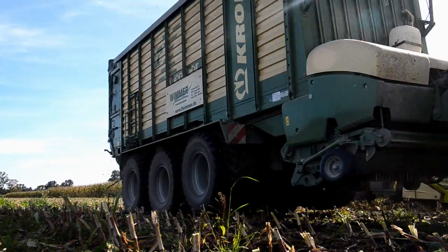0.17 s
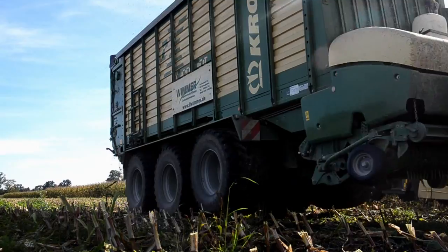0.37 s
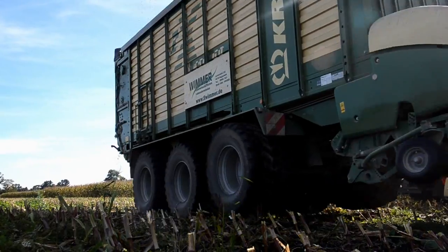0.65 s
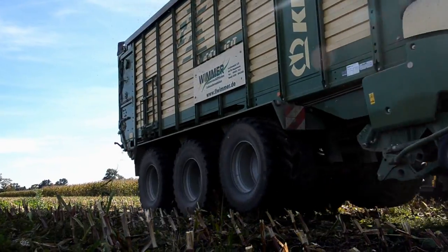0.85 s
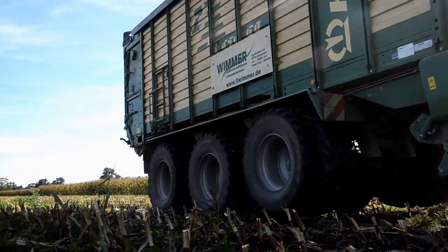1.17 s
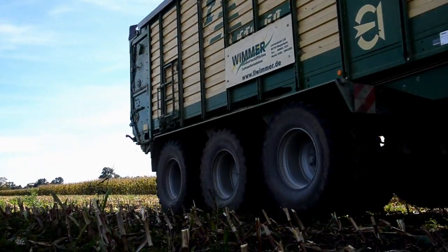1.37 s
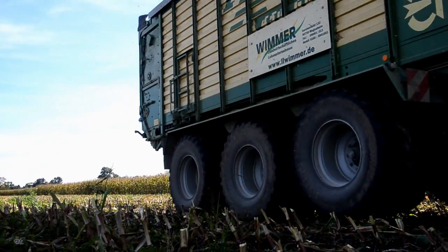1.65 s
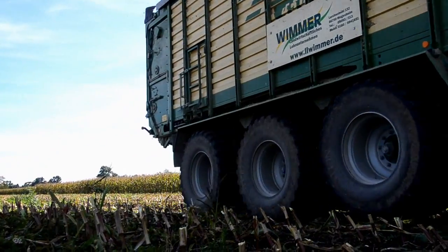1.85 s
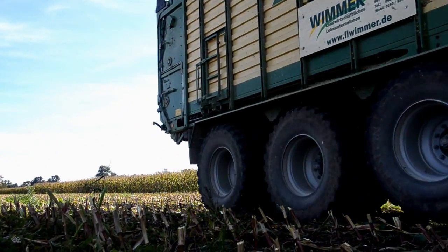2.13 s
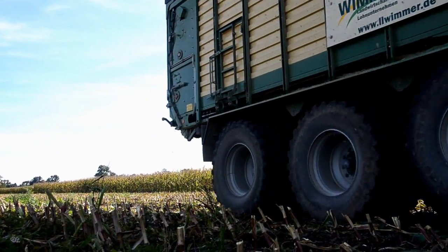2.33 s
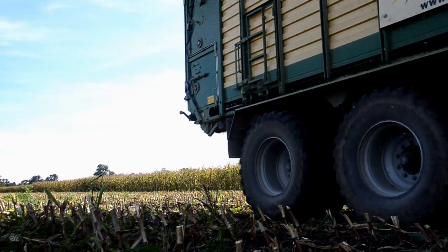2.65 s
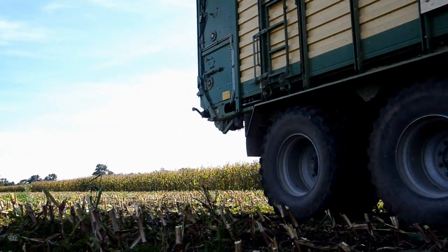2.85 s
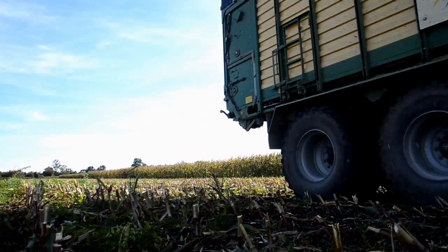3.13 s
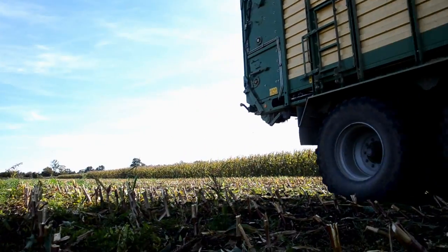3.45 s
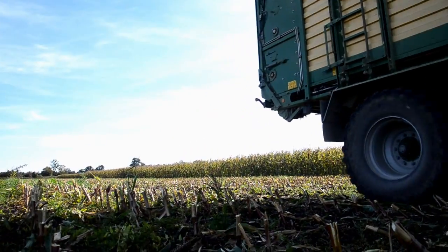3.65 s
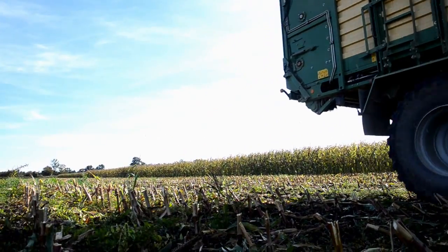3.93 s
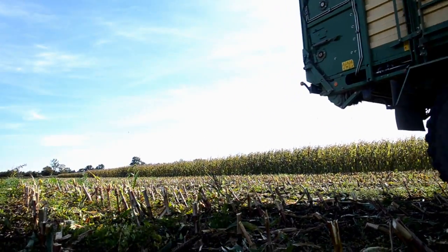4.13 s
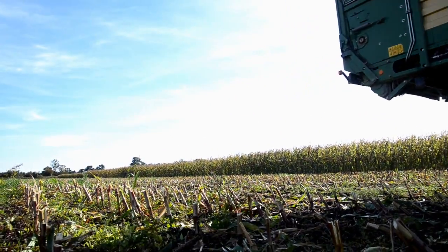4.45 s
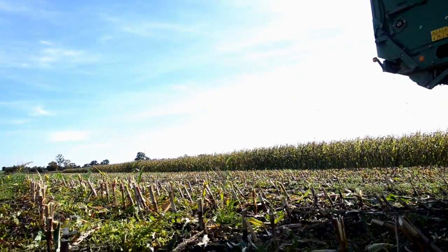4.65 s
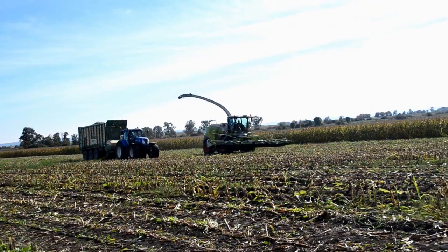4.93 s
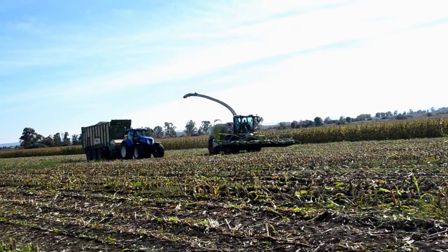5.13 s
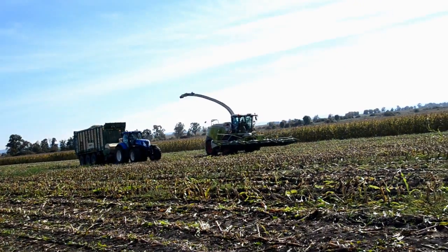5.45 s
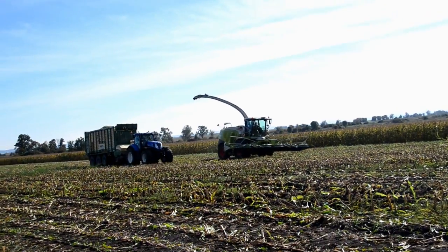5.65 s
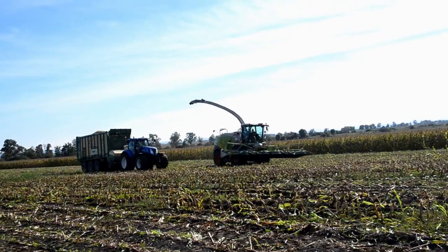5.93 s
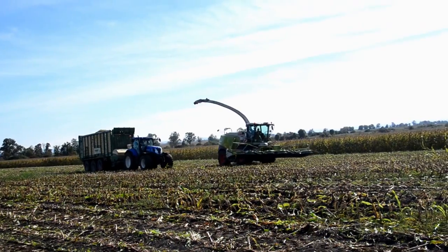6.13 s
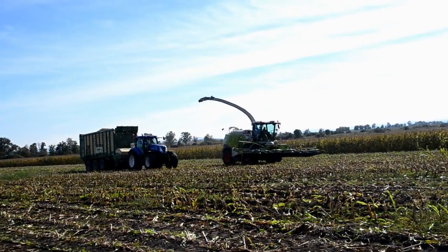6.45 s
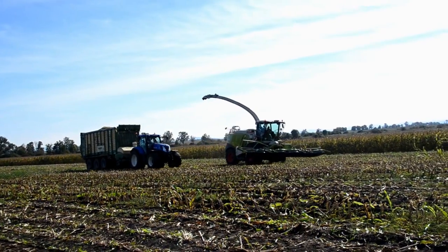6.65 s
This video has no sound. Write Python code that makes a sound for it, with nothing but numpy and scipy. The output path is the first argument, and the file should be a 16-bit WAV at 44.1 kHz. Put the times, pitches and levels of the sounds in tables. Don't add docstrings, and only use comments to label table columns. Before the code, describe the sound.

A heavy farm wagon rolls close over crackling maize stubble beside a humming harvester, then abruptly a distant machine whine with wind buffeting the microphone.

```python
import sys
import numpy as np
from scipy import signal
from scipy.fft import rfft, irfft, next_fast_len
from scipy.io import wavfile
from scipy.ndimage import uniform_filter1d

SR = 44100
rng = np.random.default_rng(int(sys.argv[2]) if len(sys.argv) > 2 else 0)


def bounce(signal):
    frames = np.transpose(np.atleast_2d(signal))
    limited = np.clip(frames, -1, 1)
    pcm = np.round(limited * 32767).astype(np.int16)
    wavfile.write(sys.argv[1], SR, pcm)


def how_loud(loudness_db):
    steps = np.asarray(loudness_db, float) / 20
    return 10 ** steps


N = 299439
TIME = np.arange(N) / SR
CUT_S = 4.8895
FADE_END_S, FADE_DB_PER_S = 5.296, 99


def in_time(rows):
    s, *columns = np.transpose(rows)
    return [np.interp(TIME, s, column) for column in columns]


def swells(rows, rest_db, edge_db_per_s):
    holds = []
    for s, length, db in rows:
        outside = np.maximum(0, np.maximum(s - TIME, TIME - s - length))
        holds.append(db - edge_db_per_s * outside)
    return np.maximum(rest_db, np.max(holds, axis=0))


def held(curves, heard):
    return [np.where(heard, c, np.mean(c[heard])) for c in curves]


def drift(rate_hz):
    pole = np.exp(-80 * np.pi * rate_hz / SR)
    noise = rng.standard_normal(N // 40 + 2002)
    slow = signal.lfilter([1], [1, -2 * pole, pole * pole], noise)[2000:]
    return np.interp(np.arange(N) / 40, np.arange(len(slow)), slow / slow.std())


def tone(hz, db, wobble):
    phase = 2 * np.pi * np.cumsum(hz * (1 + wobble * drift(9.82))) / SR
    return np.sqrt(2) * how_loud(db) * np.sin(phase + rng.uniform(0, 2 * np.pi))


def roar(colour, curves, curve_hz, offset_db, patchy_db, dips=()):
    size = next_fast_len(N)
    hz = np.maximum(np.arange(size // 2 + 1) * SR / size, 1)
    colour_hz, colour_db = np.transpose(colour)
    shape_db = np.interp(np.log(hz), np.log(colour_hz), colour_db)
    for dip_hz, width_hz, dip_db in dips:
        shape_db = shape_db + dip_db * np.exp(-((hz - dip_hz) / width_hz) ** 2)
    gain_db = shape_db + 43 + offset_db + np.mean(curves[0])
    noise = rfft(rng.standard_normal(size)) * how_loud(gain_db)
    together = drift(9)
    place = 2 * np.log2(hz / 24)
    out = 0
    for k in range(20):
        share = np.cos(np.pi / 2 * np.clip(place - k, -1, 1)) ** 2
        spot = np.interp(np.log(24 * 2 ** (k / 2)), np.log(curve_hz), np.arange(len(curves)))
        low = min(int(spot), len(curves) - 2)
        below, above = [c - np.mean(c) for c in curves[low:low + 2]]
        change_db = below + (spot - low) * (above - below)
        flicker_db = patchy_db * (0.49 * together + drift(25))
        out = out + irfft(noise * share, size)[:N] * how_loud(change_db + flicker_db)
    return out


def burst(hz, width, t60, count):
    noise = rng.standard_normal(count) * how_loud(-60 * np.arange(count) / SR / t60)
    band = [hz / width, min(hz * width, .45 * SR)]
    puff = signal.sosfilt(signal.butter(2, band, "band", fs=SR, output="sos"), noise)
    return puff / np.abs(puff).max()


def add(out, s, piece):
    at = round(s * SR)
    out[at:at + len(piece)] += piece[:N - at]


# (time [s], knife rate [Hz], level [dB])
DRUM = [(0.0, 338.2, -26.5), (0.23, 338.6, -32.5), (0.56, 340.5, -21.5), (0.61, 342.7, -29),
        (0.62, 343, -22.5), (1.39, 339.2, -20.5), (1.77, 337.2, -35), (1.98, 341.5, -31.5),
        (2.01, 339.4, -39), (2.04, 342.1, -23.5), (2.61, 343.4, -34.5), (2.83, 334.2, -36),
        (3.08, 337.7, -19.5), (3.85, 335.8, -30.5), (3.95, 336.4, -22.5), (4.1, 342.6, -35.5),
        (4.46, 337.5, -24), (4.88, 336.5, -32)]
# (multiple of knife rate, level behind the wagon [dB], roughness [dB])
DRUM_ORDERS = [(2, -42.5, 2.5), (.75, -53, 3.5), (1.26, -44.5, 5), (3, -48.5, 4), (4, -51, 4.5)]
# (time [s], length [s], level [dB])
OPENINGS = [
    [(.39, 0.53, -35.5), (1.9, .12, -38.5), (2.55, .4, -37.5), (3.5, 0.53, -37.5), (4.62, 0.27, -37.5)],
    [(0, 0.29, -30), (.66, .33, -34.5), (2.5, 0.39, -32.5), (3.38, .35, -32.5), (4.08, 0.43, -27),
     (4.65, .23, -35.5)],
    [(0, 0.12, -35.5), (.65, .3, -38.5), (1.45, .56, -36.5), (3.38, 0.097, -38.5), (3.95, 0.52, -44)],
    [(.1, .2, -42), (1.95, 0.68, -43), (3.0, 0.61, -45)],
    [(1.898, 0.081, -38.5), (2.1, .3, -40.5)],
]
OPENING_EDGE_DB_PER_S = 62
# (multiple of knife rate, level [dB])
SHAFT_ORDERS = [(.375, -39), (.5, -45.5), (.625, -42), (.875, -44)]


def harvester_drum():
    hz, level_db = in_time(DRUM)
    hz = uniform_filter1d(hz, size=5000)
    out = tone(hz, level_db + 1.5 * drift(20), wobble=.003)
    for (multiple, rest_db, rough_db), rows in zip(DRUM_ORDERS, OPENINGS):
        order_db = swells(rows, rest_db, OPENING_EDGE_DB_PER_S) + rough_db * drift(19.4)
        out += tone(hz * multiple, order_db, wobble=0.002027 * rough_db)
    for multiple, db in SHAFT_ORDERS:
        out += tone(hz * multiple, db + 5 * np.tanh(drift(3)), wobble=.03)
    return out


FIRING_HZ, FIRING_DB, FIRING_FADE_DB_PER_S = 102.4, -31, 3
# (time [s], level [dB])
SCREEN = [(0, 2), (.8, 1.5), (1.4, -0.5), (2.15, 2.5), (2.7, 3.5), (3.1, 0.3), (3.7, -2.5), (4.7, -1.5),
          (4.88, 2)]
MIDDLE_FOLLOWS, HISS_FOLLOWS = 0.38, .4
MIDDLE_LOSS_DB_PER_S, HISS_LOSS_DB_PER_S = 0.7, 1.06
# (time [s], length [s], level [dB])
RUMBLE_SWELLS = [
    (.26, 0.34, -24),
    (1.47, 1.4, -25),
    (3.36, .08, -25.5),
    (3.8, 0.032, -24.5),
    (4.4, 0.045, -25),
    (4.8, 0.073, -26.5),
]
RUMBLE_DB, RUMBLE_EDGE_DB_PER_S = -28, 43.5
NEAR_HZ = [160, 1000, 2200, 4500]
# (frequency [Hz], density [dB per Hz])
NEAR_COLOUR = [(15, -46.5), (25, -14), (101, -8), (165, -2.5), (246, -6), (290, -6.5), (340, -5.5),
               (470, -11.5), (615, -13.5), (685, -14.5), (763, -14), (1710, -16), (2700, -30.5),
               (13200, -59), (15600, -70)]
# (frequency [Hz], width [Hz], change [dB])
NEAR_DIPS = [(2380, 370, 3), (6550, 650, -4), (11800, 980, -2)]


def near_engines():
    chop = 1 + 0.072 * np.sin(2 * np.pi * .75 * FIRING_HZ * TIME)
    screen_db, = in_time(SCREEN)
    rumble_db = swells(RUMBLE_SWELLS, RUMBLE_DB, RUMBLE_EDGE_DB_PER_S)
    middle_db = MIDDLE_FOLLOWS * screen_db - MIDDLE_LOSS_DB_PER_S * TIME
    hiss_db = HISS_FOLLOWS * screen_db - HISS_LOSS_DB_PER_S * TIME
    curves = held([rumble_db, middle_db, screen_db, hiss_db], TIME < CUT_S)
    body = roar(NEAR_COLOUR, curves, NEAR_HZ, offset_db=-21.5, patchy_db=1.09, dips=NEAR_DIPS)
    firing_db = FIRING_DB - FIRING_FADE_DB_PER_S * TIME + 2.9 * drift(2.1)
    return tone(FIRING_HZ, firing_db, wobble=0.04) + chop * body


# (time [s], level [dB])
LEAVES = [(0, -69.5), (.18, -60), (.4, -61), (1.4, -57), (2.0, -56.5), (2.9, -57), (3.35, -62),
          (3.5, -72.5), (4.88, -68.5)]
LEAVES_HZ = [9000, 13500]
# (frequency [Hz], density [dB per Hz])
LEAF_COLOUR = [(3820, -25), (6500, -2.5), (8180, -2), (9850, -4.5), (13700, -11.5), (15600, -20.5)]
LEAF_TOP_FOLLOWS = 1.4


def brushed_leaves():
    leaves_db, = in_time(LEAVES)
    curves = [leaves_db, LEAF_TOP_FOLLOWS * leaves_db]
    hiss = roar(LEAF_COLOUR, curves, LEAVES_HZ, offset_db=-36.5, patchy_db=2.3, dips=NEAR_DIPS)
    return hiss * how_loud(1.2 * drift(150))


# (time [s], peak [dB])
STALKS = [(0.1171, -28), (0.2254, -41.5), (0.2478, -30.5), (0.303, -29), (0.4145, -31.5), (0.4678, -35),
          (0.5462, -33.5), (0.6474, -32.5), (0.7916, -33.5), (0.8919, -34.5), (1.0136, -35),
          (1.0899, -32.5), (1.224, -40), (1.477, -35.5), (1.5, -39), (1.6138, -38), (1.7759, -36),
          (1.9235, -41), (2.1021, -42), (2.2167, -38.5), (2.5107, -33.5), (2.6394, -33.5), (2.8643, -35.5),
          (2.9622, -36), (3.2191, -44), (3.3628, -36.5), (3.9694, -39), (4.0443, -35), (4.2419, -42),
          (4.7541, -47.5)]
SMALL_STALK_DB = -47
# (frequency [Hz], density [dB per Hz])
CRUSH_COLOUR = [(1500, -29.5), (3000, 6), (5000, -1.5), (8500, -8.5), (13500, -19.5), (15700, -17.5)]


def crushed_stalks():
    small = [(s, SMALL_STALK_DB) for s in rng.uniform(0, CUT_S, size=12)]
    away = (np.arange(2600) / SR - .03) / 0.013
    swell = np.exp(-np.where(away < 0, 1, 6.0) * away ** 2)
    pressure = np.zeros(N)
    for s, db in [*STALKS, *small]:
        add(pressure, max(s - .02, 0), how_loud(db - 12) * swell)
    crush = roar(CRUSH_COLOUR, np.zeros((2, N)), LEAVES_HZ, offset_db=0, patchy_db=1.5, dips=NEAR_DIPS)
    return pressure * crush / crush.std()


# (time [s], peak [dB])
LEAF_CRACKS = [(0.1191, -42), (0.1565, -44), (0.178, -40), (0.2463, -40), (0.3092, -38), (0.5594, -46),
               (0.7053, -48), (1.3923, -45), (1.6142, -43), (1.7894, -44)]


def leaf_cracks():
    out = np.zeros(N)
    for s, db in LEAF_CRACKS:
        add(out, s, how_loud(db - 2.0) * burst(9000, 1.7, t60=.02, count=900))
    return out


# (time [s], peak [dB], low ring [Hz], high ring [Hz])
SNAPS = [
    (3.0577, -23, 3450, 6200),
    (3.0672, -22, 2600, 4900),
    (4.0435, -31, 2850, 6000),
]


def stalk_snaps():
    out, since = np.zeros(N), np.arange(2600) / SR
    attack_s = .0008
    fading = np.minimum(since / attack_s, 1) * how_loud(-60 * np.maximum(since - attack_s, 0) / .009)
    for s, db, low_hz, high_hz in SNAPS:
        rings = np.sin(2 * np.pi * low_hz * since) + .4 * np.sin(2 * np.pi * high_hz * since)
        click = burst(3200, 1.8, t60=.009, count=len(since))
        add(out, s, how_loud(db) * (.75 * fading * rings + .45 * click))
    return out


FAR_DB, FAR_NEARING_DB_PER_S, TOP_NEARING_DB_PER_S = -44, 2.5, 3.5
DUCK_S, DUCK_WIDTH_S, DUCK_DB, DUCK_TOP_DB = 5.75, 0.14, -3, -4.5
FAR_HZ = [2000, 6000]
# (frequency [Hz], density [dB per Hz])
FAR_COLOUR = [(35, -32), (60, -9), (171, -5), (643, -21), (739, -18), (811, -17), (1200, -11.5),
              (1490, -12.5), (1710, -20.5), (2060, -18.5), (2360, -26), (2720, -28), (3760, -42),
              (4130, -42), (15600, -79.5)]
# (frequency [Hz], width [Hz], change [dB])
GROUND_DIPS = [(1735, 67, -9), (2320, 95, -1.5), (1230, 200, -6), (3670, 150, -1), (5050, 130, -2),
               (5900, 250, -3)]
WHINE_HZ = 741.4
# (multiple, level [dB], change [dB per s])
WHINE_ORDERS = [(1, -38.5, -3.5), (1.5, -47.5, -4.5), (2, -42.5, -1.5)]
# (frequency [Hz], level against the roar [dB])
FAR_LINES = [(1347, -10.5), (1898, -16.5), (2597, -28), (3340, -33), (4041, -29.5), (4819, -40)]
# (time [s], frequency [Hz], level [dB])
TURBO = [
    (5.4, 11700, -115),
    (5.52, 11850, -90),
    (5.6, 11950, -118),
    (6.15, 12700, -115),
    (6.35, 12880, -95),
    (6.79, 13080, -89),
]


def far_machines():
    since = TIME - FADE_END_S
    duck = np.exp(-((TIME - DUCK_S) / DUCK_WIDTH_S) ** 2)
    body_db = FAR_DB + FAR_NEARING_DB_PER_S * since + DUCK_DB * duck
    top_db = TOP_NEARING_DB_PER_S * since + DUCK_TOP_DB * duck
    curves = held([body_db, top_db], TIME > CUT_S)
    out = roar(FAR_COLOUR, curves, FAR_HZ, offset_db=-7, patchy_db=0.92, dips=GROUND_DIPS)
    bend = np.abs(since - .2) - 4 * np.minimum(since, 0)
    for multiple, db, change_db in WHINE_ORDERS:
        whine_db = db + change_db * bend + DUCK_DB * duck + 1.5 * drift(8)
        out += tone(WHINE_HZ * multiple, whine_db, wobble=.0006)
    for line_hz, db in FAR_LINES:
        out += tone(line_hz, body_db + db + 2 * drift(4.2), wobble=0.00081)
    return out + tone(*in_time(TURBO), wobble=.002)


# (time [s], length [s], level [dB])
GUSTS = [(4.94, .015, -15), (4.98, .015, -19), (5.21, 0.022, -22), (5.28, .13, -22.5), (5.48, .02, -27.5),
         (5.57, .1, -24), (5.7, 0.069, -21), (5.8, 0.039, -22), (5.93, 0.24, -27), (6.18, 0.13, -29.5),
         (6.36, .03, -27.5), (6.43, 0.068, -23), (6.59, .015, -25.5), (6.65, 0.094, -24.5)]
CALM_DB, GUST_EDGE_DB_PER_S = -37, 199
CALM_HIGH_DB, GUST_HIGH_EDGE_DB_PER_S = -43, 497
WIND_HZ = [150, 500]
# (frequency [Hz], density [dB per Hz])
WIND_COLOUR = [(15, -59), (30, -35), (64, -6.5), (135, 1.5), (250, -5), (450, -16), (800, -20.5),
               (1400, -41), (2500, -100)]


def wind_rumble():
    low_db = swells(GUSTS, CALM_DB, GUST_EDGE_DB_PER_S)
    high_db = swells(GUSTS, CALM_HIGH_DB, GUST_HIGH_EDGE_DB_PER_S)
    lumps = how_loud(8.0 * np.tanh(drift(50) / 1.5))
    curves = held([low_db, high_db], TIME > CUT_S)
    return roar(WIND_COLOUR, curves, WIND_HZ, offset_db=-25.0, patchy_db=0.4) * lumps


# (peak time [s], peak [dB], swing [Hz])
BUFFETS = [(5.22, -6.5, 420), (5.289, -14, 322), (5.329, -15.5, 342), (5.362, -15, 323), (5.385, -14, 314),
           (5.397, -11.5, 420), (5.415, -14, 316), (5.493, -19, 386), (5.57, -17, 335), (5.614, -18, 358),
           (5.636, -4, 422), (5.646, -17, 220), (5.68, -14, 327), (5.703, -12.5, 448), (5.722, -12, 285),
           (5.729, -13, 327), (5.742, -9, 315), (5.77, -11, 399), (5.804, -21, 308), (5.83, -9.5, 324),
           (5.883, -17.5, 494), (5.966, -18.5, 323), (6.101, -12, 274), (6.135, -10.5, 350),
           (6.198, -15, 223), (6.439, -16, 255), (6.461, -13, 263), (6.503, -16, 270), (6.711, -17, 429),
           (6.725, -14.5, 259),
           (4.94, -12, 450), (4.954, -6, 500), (4.985, -7, 300), (4.997, -12, 500), (6.313, -16, 350),
                 (6.384, -14, 300), (6.468, -12, 560), (6.603, -16, 200), (6.678, -17.5, 200),
                 (6.738, -18, 320)]
SMALL_BUFFET_DB = 6


def wind_buffets():
    out = np.zeros(N)
    gust_db = swells(GUSTS, CALM_HIGH_DB, GUST_HIGH_EDGE_DB_PER_S)
    small = rng.uniform([FADE_END_S, -4, 230], [N / SR, 2, 440], size=(35, 3))
    small[:, 1] += gust_db[(small[:, 0] * SR).astype(int)] + SMALL_BUFFET_DB
    for s, db, hz in [*BUFFETS, *small]:
        turns = (np.arange(800) / SR - .009) * np.clip(hz, 200, 600)
        shape = np.exp(-np.abs(2.4 * turns) ** 1.4) * np.cos(2 * np.pi * (turns + rng.random()))
        add(out, s - .009, how_loud(db + 1.5) * shape)
    return out


# (time [s], peak [dB])
TICKS = [
    (5.6348, -34.5),
    (5.678, -43.5),
    (5.702, -42),
    (5.7314, -44.5),
    (5.7684, -48.5),
    (5.8294, -52.5),
    (6.1364, -50),
]


def overload_ticks():
    out = np.zeros(N)
    for s, db in TICKS:
        add(out, s, how_loud(db - 4.0) * burst(3500, 3.0, t60=0.004, count=600))
    return out


def scene():
    stubble = brushed_leaves() + crushed_stalks() + leaf_cracks() + stalk_snaps()
    near = harvester_drum() + near_engines() + stubble
    wind = wind_rumble() + wind_buffets() + overload_ticks()
    far = (far_machines() + wind) * how_loud(FADE_DB_PER_S * np.minimum(TIME - FADE_END_S, 0))
    near_share = np.clip((CUT_S - TIME) / .00004, 0, 1)
    return (near_share * near + (1 - near_share) * far)[None, :]


def band_limit(x):
    return signal.sosfilt(signal.butter(12, 15700, fs=SR, output="sos"), x)


CEILING = .3


def record(dry):
    heard = signal.sosfilt(signal.butter(3, 38, "high", fs=SR, output="sos"), dry)
    limited = heard / (1 + (np.abs(heard) / CEILING) ** 6) ** (1 / 6)
    mix = signal.sosfilt(signal.cheby2(12, 60, 16500, fs=SR, output="sos"), limited)
    return band_limit(mix)


dry = scene()
out = record(dry)
bounce(out)
```